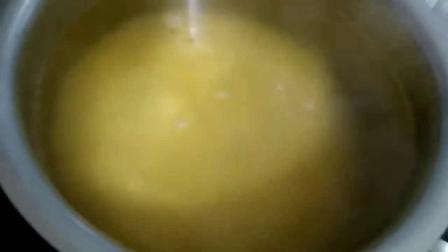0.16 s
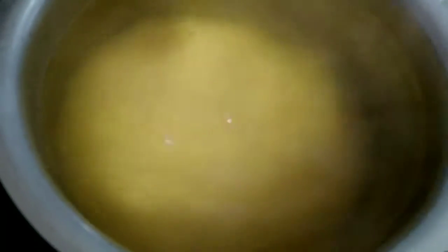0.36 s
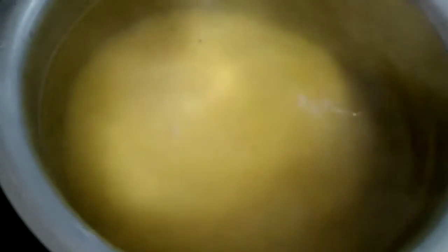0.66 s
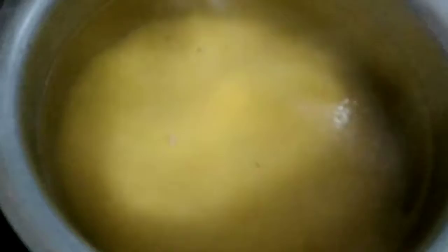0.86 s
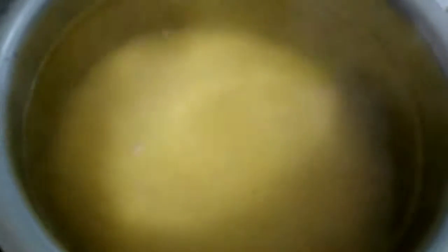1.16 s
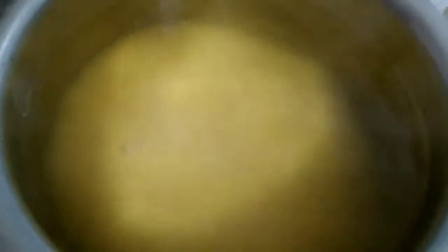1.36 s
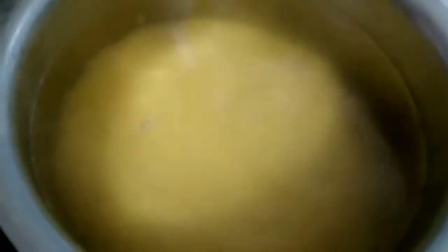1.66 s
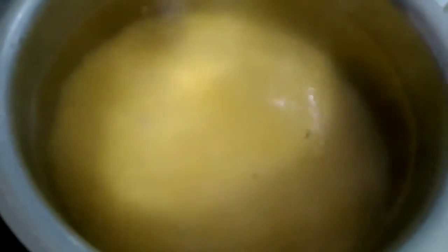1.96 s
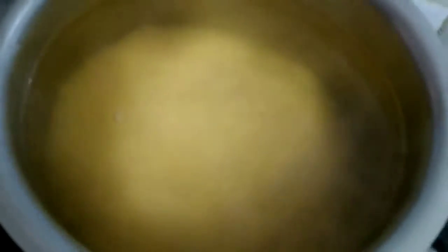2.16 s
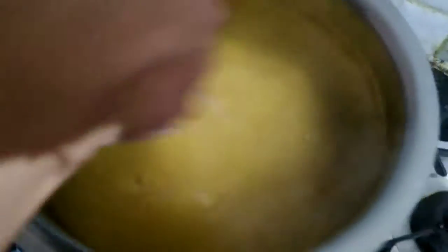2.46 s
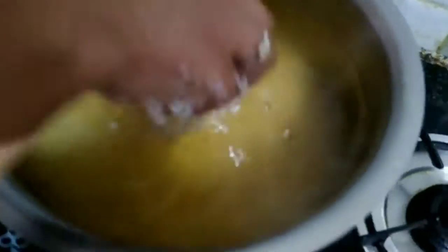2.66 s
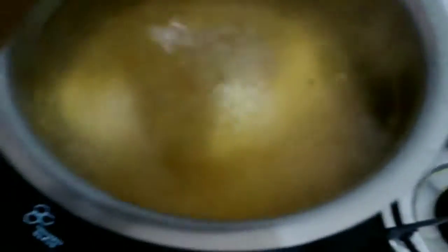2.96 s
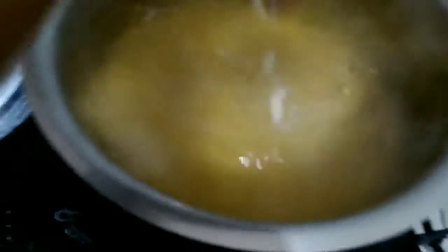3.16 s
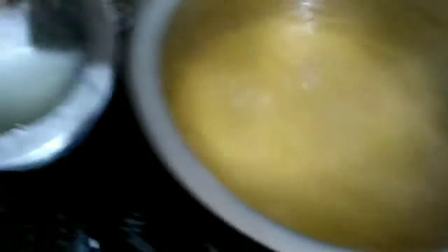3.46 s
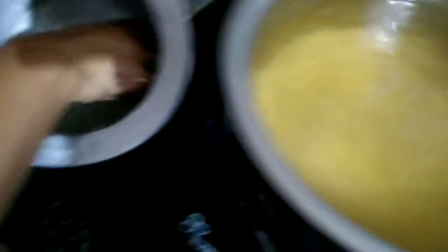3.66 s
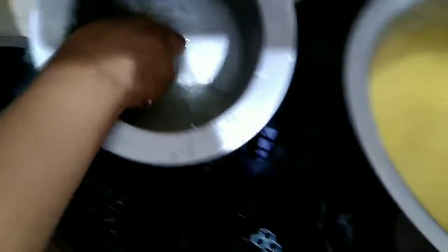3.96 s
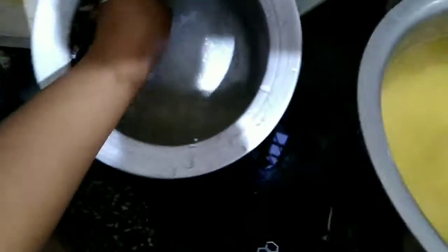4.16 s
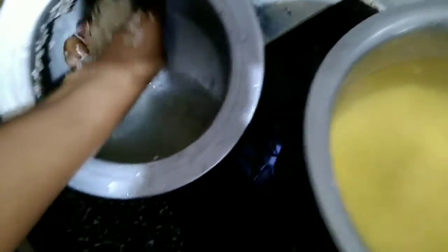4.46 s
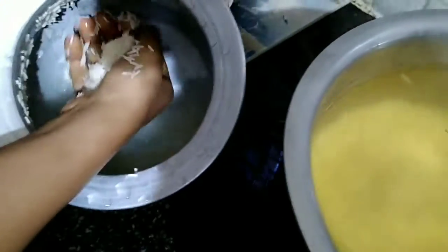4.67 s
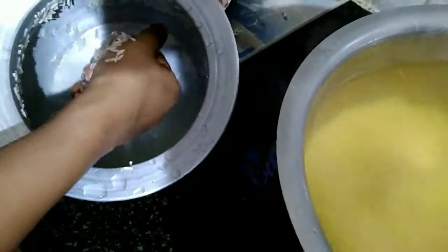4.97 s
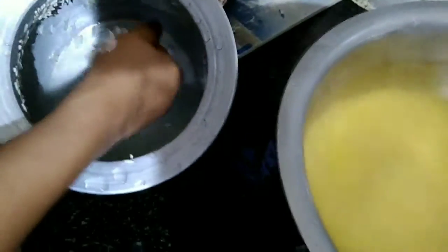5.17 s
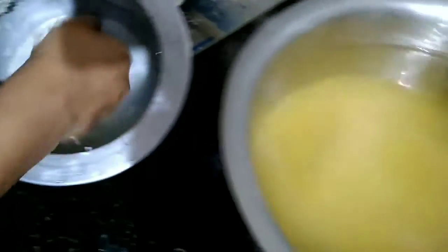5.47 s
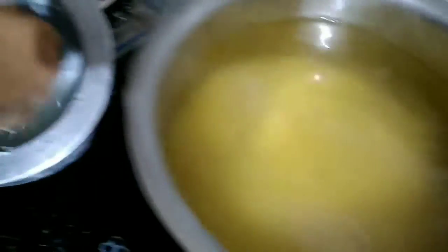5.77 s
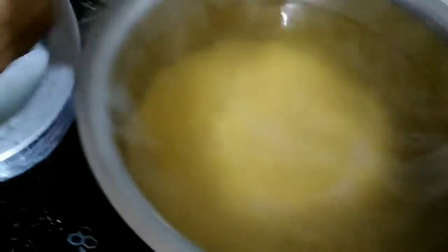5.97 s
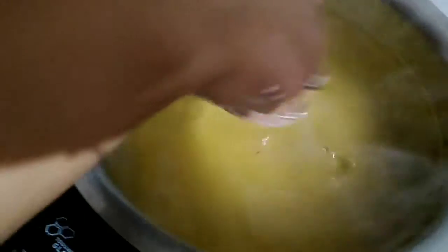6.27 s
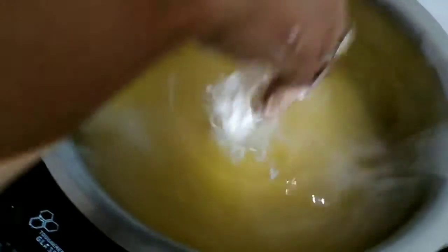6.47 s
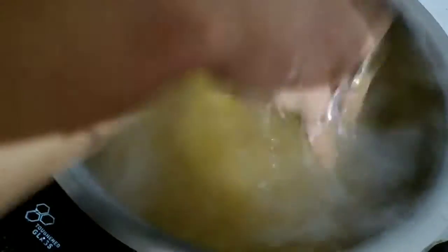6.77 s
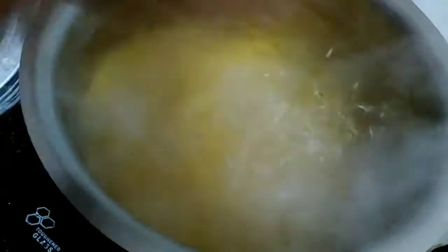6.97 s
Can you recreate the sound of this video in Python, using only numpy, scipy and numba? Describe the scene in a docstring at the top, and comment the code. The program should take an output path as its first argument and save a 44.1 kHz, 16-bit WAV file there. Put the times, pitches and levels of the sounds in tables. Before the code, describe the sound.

Close watery swishing and drips, a slap of soaked rice into hot water, gritty digging in a steel bowl, then a second splashy handful.

```python
"""A hand scoops soaked rice from a steel bowl of water into a simmering pot, in a small kitchen.
Throughout: stove rumble, microphone hiss, faint simmer. 0-1.3 s: swishing; bubbles ring, drops hit, air gulps.
2.7-3.3 s: rice slaps and patters (burst noise, pot modes). 3.7-5.6 s: digging; grit crunches, bubbles churn,
knocks ring the bowl's modes, rubbed steel sings. 5.9-7 s: a brush of the rim, then rice falls again
and the pot's air resonance glides, mostly up. Heard by a close, bright stereo microphone."""
import sys
import numpy as np
from scipy import signal
from scipy.fft import rfft, irfft
from scipy.io import wavfile
from scipy.ndimage import uniform_filter1d
from numba import njit

SR = 44100
rng = np.random.default_rng(int(sys.argv[2]) if len(sys.argv) > 2 else 0)


def bounce(signal):
    """Save signal as a 16-bit WAV file at the path given by the first command-line argument."""
    frames = np.transpose(np.atleast_2d(signal))
    limited = np.clip(frames, -1, 1)
    pcm = np.round(limited * 32767).astype(np.int16)
    wavfile.write(sys.argv[1], SR, pcm)


N = 314111
TIME = np.arange(N) / SR

# stove rumble, microphone hiss: [f/Hz, relative level/dB per Hz]
STOVE_SPECTRUM = [(20, -27.5), (40, -11), (65, -2), (100, 2.5), (150, -3), (230, -4.5), (330, -2.5),
                  (450, -49), (800, -31), (1300, -49), (3000, -55.5)]
HISS_SPECTRUM = [(1000, 15.5), (3000, -57), (5000, -10), (8000, -21), (12000, 10.5), (16000, 10)]
STOVE_DB, HISS_DB = -54.5, -76

# left-right balance of the microphone: [f/Hz, left-right/dB]
PORT_TILT = [(100, -0.5), (300, 1), (800, -0.5), (2500, 1), (5000, -1.5), (9000, 0.5), (13000, 2.5)]
CUTOFF_HZ = 15800

# hollow murmur of the air in the vessels: [t/s, level/dB]
HOLLOW_LEVEL = [(2.3, -84), (2.45, -62), (2.6, -54), (2.8, -73), (3.1, -56.5), (3.27, -73), (3.34, -59.5),
                (3.47, -57), (3.65, -82), (4.22, -55), (4.85, -55), (5.15, -67.5), (5.3, -56), (5.55, -65),
                (5.7, -54.5), (5.81, -66.5), (5.95, -53), (6.24, -62), (6.5, -50), (6.7, -56), (6.86, -64),
                (6.98, -46.5), (7.12, -63.5)]
# air resonances of the vessels: [f/Hz, width/Hz, level/dB]
CAVITY_MODES = [(582, 48, 1), (663, 48, 1), (752, 30.5, 8), (812, 42, 3.5), (844, 8.5, 10)]
CAVITY_TOP_HZ = 1050

# fingers and rice rub the steel: [t/s, level/dB, hold/s]
RUBS = [(5.22, -71, .02), (5.285, -52, 0.047), (5.38, -67, 0.0055)]
RUB_SWELL_S, RUB_FADE_S = .04, .065
# steel modes that rubbing brings out: [f/Hz, width/Hz, level/dB]
RUBBED_MODES = [(743, 62, 5.5), (1196, 18, 4), (1580, 53, -24), (1820, 30, -31), (2004, 27, -6.5),
                (2320, 33, -8), (2950, 30, -18), (3230, 90, -18), (3320, 110, -17)]
# brushes of the rim: [t/s, level/dB, swell/s, hold/s, fade/s]
BRUSHES = [(5.914, -58, .008, .02, .06)]
# modes of the bowl's rim: [f/Hz, width/Hz, level/dB]
RIM_MODES = [(1070, 24, -15), (1330, 29, -4), (1500, 39, -2), (1740, 60, 6), (2180, 35, -16),
             (2820, 22, -13.5), (3060, 52, -9), (3117, 28, 4), (3550, 28, -4)]

# light knocks and slaps on the steel: [t/s, level/dB]
KNOCKS = [(3.779, -49.5), (4.694, -44.5), (4.928, -41)]
# modes of the knocked steel: [f/Hz, level/dB, t60/s]
BOWL_MODES = [(380.5, 0, 0.34), (660, -8, 0.34), (806, 3, 0.26), (1082, -20, 0.13), (1310, -12, 0.18),
              (1880, -6, 0.11), (1965, 5, 0.07), (2170, -12, 0.046), (2304, 0, 0.19), (2430, -1, .09),
              (2783, -16, .16), (2940, -11, .16)]

# pot air resonance as the hand opens and lifts away: [t/s, f/Hz, level/dB]
OPENING = [(6.62, 810, -90), (6.66, 846, -56), (6.74, 910, -72), (6.8, 1100, -63.5), (6.85, 1180, -58),
           (6.89, 1214, -47.5), (6.92, 1130, -48.5), (6.97, 1147, -54), (7.12, 1160, -61.5)]
OPENING_WIDTH_HZ, OVERTONE_RATIO, OVERTONE_DB = 150, 1.97, -5
# modes of the half-full pot under falling rice: [f/Hz, width/Hz, level/dB]
POT_MODES = [(790, 70, -1), (1070, 15, 5.5), (1815, 70, -8.5), (2160, 26, 10), (2450, 200, 6),
             (2970, 68, 11), (3800, 44, 3), (3810, 49, 6), (4080, 41, 15)]
POT_RE_RICE_DB = -12.5

# tiny bubbles snapping close by: [t/s, relative level/dB, nominal f/Hz, left-right/dB]
POPS = [(0.989, -24, 7600, 13), (1.2772, -22, 13900, 8), (1.3432, -16, 13800, 12), (2.7202, -19, 15100, 14),
        (2.913, -17, 9600, 6), (2.9898, -14.5, 8800, 3), (3.127, -20.5, 10600, 1), (3.6613, -18, 12800, 4),
        (3.8225, -15, 11400, 4), (4.538, -17, 9400, -2), (4.609, -16, 13900, 21), (6.657, -11.5, 11700, 12),
        (6.895, -15, 12400, 15)]
# free bubbles: [t/s, f/Hz, relative level/dB]
BUBBLES = [(.012, 539, -39.5), (.074, 350, -44.5), (.06, 2360, -35), (.148, 2300, -38), (.163, 2110, -47),
           (.305, 1820, -42), (.456, 1940, -34), (.585, 2416, -32.5), (.676, 1550, -37), (.81, 1970, -42),
           (.508, 537, -36), (.535, 572, -38.5), (.572, 590, -33), (.615, 592, -34.5), (.645, 556, -44),
           (1.001, 444.4, -40.5), (1.003, 3000, -38), (1.008, 2454, -37.5), (1.066, 512, -37.5),
           (1.075, 2430, -26), (1.11, 462, -39.5), (1.127, 2160, -42), (1.158, 2080, -56),
           (1.228, 4120, -44), (1.322, 4340, -34.5), (1.346, 3600, -32), (1.372, 3080, -34),
           (1.376, 2830, -37), (1.41, 3280, -41), (1.39, 1403, -37.5), (1.464, 2720, -41.5),
           (1.466, 3640, -42), (1.485, 2560, -47), (1.499, 4260, -42), (1.529, 1920, -44),
           (1.535, 3700, -42), (1.601, 2940, -43.5), (1.621, 2220, -37), (1.745, 3580, -50.5),
           (1.94, 3020, -42.5), (2.04, 3720, -40.5), (2.045, 3000, -55), (2.234, 2830, -39.5),
           (2.262, 4570, -39), (2.264, 2660, -53), (3.004, 3830, -31), (3.085, 1038, -48.5),
           (3.183, 2710, -52.5), (4.478, 2410, -23.5), (4.497, 444.6, -32), (4.53, 739, -32),
           (4.255, 350, -43), (4.345, 1335, -42), (4.4, 955, -43), (4.46, 1737, -31.5), (5.208, 3180, -40),
           (5.213, 1800, -55), (5.497, 4480, -32), (6.097, 466, -39), (6.135, 444, -42), (6.185, 426, -45)]
# air gulping out from under hand or rice, quickly damped: [t/s, f/Hz, relative level/dB]
GULPS = [(.258, 2420, -13.5), (.347, 2800, -10.5), (.367, 718, -26.5), (.455, 2300, -22.5), (.63, 535, -21),
         (1.941, 3950, -24), (2.724, 2520, -29), (2.775, 1900, -31.5), (2.84, 2130, -37), (2.93, 2380, -35),
         (2.995, 1880, -36), (3.015, 2360, -33), (3.083, 860, -33.5), (3.11, 770, -33), (3.87, 510, -20.5),
         (4.18, 1970, -23), (4.498, 476, -16.5), (4.507, 470, -21), (4.536, 944, -24), (4.545, 646, -25.5),
         (4.695, 2950, -17), (4.929, 2310, -18), (5.498, 4410, -36), (6.585, 2320, -36), (6.605, 1980, -48),
         (6.622, 2550, -31), (6.658, 2390, -21.5), (6.676, 2020, -34), (6.894, 2180, -24),
         (6.943, 2020, -24)]
BUBBLE_CYCLES, GULP_CYCLES = 17.4, 3.26   # decay time in cycles

# wet rice slides into the water: [t/s, level/dB, swell/s, hold/s, body/dB]
RICE = [(2.715, -40, 0.0057, 0.046, 4.5), (2.834, -42, 0.0084, 0.13, 3.5), (3.014, -40, 0.0035, 0.0022, 6),
        (3.093, -80, 0.0083, 0.19, -24), (3.324, -50, 0.023, 0.0097, -7), (5.933, -93.5, 0.036, 0.066, -38),
        (6.365, -52.5, 0.019, 0.23, -24), (6.558, -45, 0.026, 0.058, 8.5), (6.797, -57.5, 0.062, 0.05, -6),
        (6.937, -39, 0.0064, 0.0027, 3)]
RICE_FADE_S = 0.031
# splashes of water: [t/s, level/dB, swell/s, body/dB]
SPLASHES = [(0.011, -40, 0.0023, 13), (0.34, -33, 0.0062, 7), (0.668, -38, 0.0015, -6),
            (.859, -38, 0.0033, -21), (0.999, -40, 0.0045, 10.5), (1.115, -41.5, 0.0086, 14),
            (1.368, -34, 0.0043, 9), (2.021, -32.5, 0.0078, -8), (2.238, -41, 0.012, -6.5),
            (2.829, -24.5, 0.0054, -2.5), (3.728, -26.5, 0.0045, -19), (3.775, -42.5, 0.0023, 24.5),
            (4.53, -32, 0.0045, 17.5), (5.678, -42.5, 0.01, -30), (6.642, -34, 0.0064, -4)]
FADE_PER_SWELL = 1.74
# single drops hit the water: [t/s, level/dB, body/dB]
DROPS = [(.019, -34, -15), (0.039, -33, -16), (.054, -53, -6), (.129, -53, -16), (.235, -39, -12),
         (0.258, -44, 17), (0.309, -28, 1), (.346, -30.5, -3), (.451, -35, 2), (0.48, -24.5, -17),
         (0.503, -30, -24), (.562, -30, -14), (0.58, -26.5, 0), (0.67, -29.5, 3), (0.676, -36, -5),
         (0.717, -32, -6), (0.779, -33, -16), (0.792, -37, -9), (.853, -32.5, -15), (0.88, -44, -18),
         (.918, -41, -26), (.959, -45, -20), (0.971, -42, -25), (0.989, -33.5, -12), (1.016, -33, -15),
         (1.02, -37, -4), (1.028, -46, -15), (1.118, -39, -12.5), (1.129, -32.5, -4), (1.184, -49, 8),
         (1.227, -50, 16), (1.304, -40.5, -6), (1.328, -39, -4), (1.339, -30, -1), (1.463, -39, 12),
         (1.498, -47.5, 12), (1.53, -39.5, 6), (1.6, -40, 7), (1.62, -38.5, 0), (1.867, -55, -21),
         (1.877, -45, -5), (1.892, -47, -12), (1.941, -37, -9.5), (2.1, -43, -26), (2.281, -47, -23),
         (2.622, -43.5, -10), (2.721, -20.5, -20), (2.87, -40, -11), (2.912, -24.5, 0), (2.934, -32, -9),
         (2.941, -28, -18), (2.946, -27, -1), (2.989, -20, -6), (3.029, -43, -2), (3.056, -29, -12),
         (3.126, -44, -13), (3.182, -51.5, 7.5), (3.197, -46, -30), (3.222, -44, -27), (3.228, -47, -20),
         (3.264, -46.5, -6), (3.409, -64, -16), (3.488, -52.5, -21), (3.661, -45.5, -17), (3.69, -33, -9.5),
         (3.737, -28, -26), (3.821, -32, -10), (3.892, -40, 21), (3.909, -42, -8), (4.034, -38, 20),
         (4.096, -31, -18), (4.4, -26, -10), (4.433, -27, -12), (4.539, -31, 1.5), (4.548, -45, 8),
         (4.609, -31, -20), (4.643, -28.5, -12), (4.696, -30, 13), (4.706, -33, -20), (4.928, -28, -17),
         (4.965, -39, -20), (5.246, -42, -30), (5.414, -43, -19), (5.497, -51, -10), (5.567, -73, -20),
         (5.652, -53, -17), (5.681, -35, -24), (5.739, -48, -25), (5.83, -56.5, -22), (5.918, -58, -5),
         (6.122, -52, -15), (6.132, -55, -30), (6.179, -58.5, -19), (6.268, -57, -17), (6.648, -25.5, 0),
         (6.653, -28, 5), (6.680, -25, 3), (6.856, -42, -7), (6.894, -28, 3), (6.942, -39, -3)]
DROP_SWELL_S, DROP_FADE_S = 0.00044, 0.0032
# stray drops flung by the hand; level is against the vigour curves
STRAYS_PER_S, STRAY_DB, STRAY_BODY_DB = 150, -3.5, 6
# slap colour, treble and body: [f/Hz, relative level/dB per Hz]
SLAP_TOP = [(2500, -41.5), (4000, -6.5), (6000, -1), (8000, -0.5), (11500, 6), (14000, 1.5), (16000, -5)]
SLAP_BODY = [(100, -24.5), (400, 4), (800, -7), (1350, -21.5), (2100, -1), (3500, 1.5), (5000, -11.5),
             (8000, -26)]
SLAP_WIDTH_DB = 1.5   # one-port impacts against those common to both
# where the slaps lie, leaning left, then nearly ahead: [t/s, left-right/dB]
BEARING = [(0, 7), (2.25, 5.5), (2.75, 0), (4.6, 3), (7, 0.5)]

# wet grains sliding over each other: [f/Hz, relative level/dB per Hz]
GRAIN_HISS = [(1000, -54), (1700, -54), (2600, -23), (3500, -14), (5890, -10), (12400, 3.5), (15500, 0)]
RICE_FINENESS_DB_PER_DB = 0.98   # hiss gained per dB of body lost
RICE_HISS_DB = -4.5
# falling rice, each against the level of the rice
RICE_PATTER_DB, RICE_SPRAY_DB, RICE_TINKLE_DB, RICE_GURGLE_DB = -5.5, -20, -24, -22

# vigour of the hand, swishing and digging: [t/s, level/dB]
SWISH = [(0, -44), (.2, -47), (.5, -43), (.65, -44), (.85, -51.5), (.95, -76), (1.14, -42.5), (1.26, -75),
         (1.32, -118)]
DIG = [(3.73, -42.5), (3.79, -39.5), (3.87, -40.5), (3.97, -43.5), (4.2, -33.5), (4.34, -38.5), (4.54, -37),
       (4.65, -43.5), (4.83, -43.5), (5.1, -68.5), (5.35, -57.5), (5.62, -100)]
USUAL_VIGOUR_DB = -44
# level at usual vigour/dB, gain per vigour (dB per dB)
SLOSH_DB, SLOSH_FOLLOWS = -47, 0.26
DIGGING_DB, DIGGING_FOLLOWS = -51.5, 1
SWISH_TINKLE_DB, SWISH_TINKLE_FOLLOWS = -47.5, 1.0
DIG_TINKLE_DB, DIG_TINKLE_FOLLOWS = -52, 1.17
PATTER_DB, PATTER_FOLLOWS = -45.5, 0.87
SPRAY_DB, SPRAY_FOLLOWS = -42, 0.61
GURGLE_DB = -56
# steady simmer: small bubbles; patter and spray
SIMMER_TINKLE_DB, SIMMER_DB = -80.5, -84

# grains crunching in the fist: [f/Hz, relative level/dB per Hz]
GRIT_SPECTRUM = [(400, -10), (1200, -1.5), (2300, -1), (5000, -5.5), (9000, -2), (15000, -4.5)]
GRIT_PER_S, GRIT_DB, GRIT_SURGE_DB = 600, -48.5, 3.5


def from_db(db):
    """Amplitude gain of a level in dB."""
    return 10 ** (np.asarray(db) / 20)


def rms_one(x):
    """Scale to rms 1."""
    return x / np.sqrt(np.mean(x ** 2) + 1e-20)


def level_curve(rows, column):
    """Gain along a dB column, -120 dB outside its span."""
    rows = np.array(rows)
    return from_db(np.interp(TIME, rows[:, 0], rows[:, column], left=-120, right=-120))


def panned(x, left_db):
    """Split the left-right level difference evenly over two channels."""
    return x * from_db(np.array([[.5], [-.5]]) * left_db)


def coloured(x, spectrum):
    """Causal minimum-phase filter, built by cepstrum from a (f/Hz, level/dB) table."""
    size = 4096
    hz, db = np.transpose(spectrum)
    bins_hz = np.arange(size // 2 + 1) * SR / size
    shape_db = np.interp(np.log(bins_hz + 1), np.log(hz), db)
    cepstrum = irfft(np.log(from_db(shape_db)))[:size // 2]
    cepstrum[1:] *= 2   # fold to the causal side
    response = irfft(np.exp(rfft(cepstrum, size)))
    return signal.oaconvolve(np.atleast_2d(x), response[None], axes=1)[:, :N]


def drift(knots_per_s):
    """Slow random curve: unit-normal knots joined by lines."""
    knots = rng.standard_normal(N // 20)
    return np.interp(TIME * knots_per_s, np.arange(len(knots)), knots)


def ring(clicks, hz, t60_s):
    """Two-pole resonator: a unit click starts a decaying sine of height about 1."""
    r = from_db(-60 / (t60_s * SR))
    w = 2 * np.pi * hz / SR
    return signal.lfilter([0, np.sin(w)], [1, -2 * r * np.cos(w), r * r], clicks + 1e-18)


def impacts(per_s, spread_db):
    """Random clicks, many small and a few large; mean power 1."""
    sizes = from_db(spread_db * np.minimum(rng.exponential(1, N), 4))
    signed = sizes * rng.choice([-1, 1], N)
    return rms_one(signed * (rng.random(N) < per_s / SR))


def burst(s, level_db, swell_s, hold_s, fade_s):
    """Gain that swells linearly, holds, then decays exponentially."""
    out = np.zeros(N)
    span = slice(int(s * SR), int(s * SR) + SR)
    t = TIME[span] - TIME[span][0]
    swell = np.minimum(t / swell_s, 1)
    fade = np.exp(-np.maximum(t - swell_s - hold_s, 0) / fade_s)
    out[span] = from_db(level_db) * swell * fade
    return out


@njit
def add(out, start, step, life, size, lag, glide):
    """Lay rising, dying sines into two channels, sized per channel, the right one lagged."""
    for k in range(len(start)):
        phase = 0.
        for i in range(min(int(5 * life[k]), out.shape[1] - start[k] - lag[k])):
            age = i / life[k]
            phase += step[k] * (1 + glide * age)
            wave = np.sin(phase) * np.exp(-age) * (1 - np.exp(-phase / 3))
            out[0, start[k] + i] += size[k, 0] * wave
            out[1, start[k] + i + lag[k]] += size[k, 1] * wave


def grains(low_hz, high_hz, per_s, cycles, spread_db, tilt_db, clump_db, scatter_db, patchy_db, glide=0.011):
    """Impacts trap bubbles, each with a pitch and place, in clumps of wandering favourite size; level evened near 1."""
    most_lag = 12   # samples
    count = int(per_s * N / SR)
    when, pitch, rank, place = rng.random((4, count))
    left_db = rng.standard_normal(count) * scatter_db
    start = (when * N).astype(int)
    octaves = pitch * np.log2(min(high_hz, CUTOFF_HZ) / low_hz)
    hz = low_hz * 2 ** octaves
    size_db = spread_db * np.minimum(-np.log(rank), 5) + tilt_db * octaves
    size_db += clump_db * drift(70)[start]
    size_db += patchy_db * np.cos(2 * np.pi * (octaves * 2 + drift(12)[start] / 2))
    sizes = panned(from_db(size_db), left_db).T.copy()
    x = np.zeros((2, N))
    add(x, start, 2 * np.pi * hz / SR, cycles * SR / hz, sizes, (place * most_lag).astype(int), glide)
    x = rms_one(x)
    local_power = uniform_filter1d(np.mean(x * x, axis=0), SR // 8)
    return x / np.sqrt(np.abs(local_power) + .02)


def mottled(x, echo_share, sway_s=.00035, sway_per_s=14):
    """Close echoes off the moving hand and water give a shifting, uneven colour."""
    out = x
    for delay_s in (.00045, .0008, .0014):
        read = TIME - delay_s - sway_s * np.tanh(drift(sway_per_s))
        out = out + echo_share * np.array([np.interp(read, TIME, channel) for channel in out])
    return out / (1 + echo_share ** 2) ** (3 / 2)


def kitchen(x, walls_db, room_db, walls_t60=0.049, room_t60=0.24):
    """Direct sound, quick flutter between steel walls, then the tiled room; low echoes are alike at both ports."""
    t = TIME[:SR // 2]
    response = np.zeros((2, len(t)))
    response[0, 0] = response[1, 5] = 1   # right port 5 samples late
    highpass = signal.butter(1, 750, "high", fs=SR, output="sos")
    for level_db, t60_s, first_s in ((walls_db, walls_t60, .0004), (room_db, room_t60, .005)):
        mid, side = rng.standard_normal(response.shape)
        side = signal.sosfilt(highpass, side)
        echoes = (mid + side * [[1], [-1]]) * from_db(-60 * t / t60_s) * (t > first_s)
        response += from_db(level_db) * rms_one(echoes) / np.sqrt(len(t))
    response /= np.sqrt(np.sum(response ** 2) / 2)
    return signal.oaconvolve(np.broadcast_to(x, (2, N)), response, axes=1)[:, :N]


def resonated(modes, waver_db=6.0):
    """Soft contacts excite a few resonances, each swelling and sinking on its own; rms 1."""
    contacts = impacts(per_s=1100, spread_db=6.0)
    x = np.zeros(N)
    for k, (hz, width_hz, db) in enumerate(modes):
        t60_s = np.log(1000) / np.pi / width_hz
        gain = (-1) ** k * from_db(db + waver_db * drift(12)) * width_hz
        x += gain * ring(contacts, hz, t60_s)
    return rms_one(kitchen(x, walls_db=16.5, room_db=15.0))


def gliding(hz, width_hz):
    """Soft contacts through one steep resonance that moves; rms 1."""
    turn = np.exp(2j * np.pi * np.cumsum(hz) / SR)
    r = np.exp(-np.pi * width_hz / SR)
    contacts = impacts(per_s=3900, spread_db=2.0)
    # shift down to 0 Hz, lowpass, shift back
    x = turn * signal.lfilter([1], [1, -2 * r, r * r], contacts / turn + 1e-18)
    return rms_one(kitchen(x.real, walls_db=-3, room_db=-4))


def vigour(curve):
    """How hard the hand moves the water; 1 is usual."""
    return level_curve(curve, 1) / from_db(USUAL_VIGOUR_DB)


def falling_rice():
    """Gain of the rice as it lands."""
    return sum(burst(s, db, swell, hold, RICE_FADE_S) for s, db, swell, hold, _ in RICE)


def background():
    """Filtered noise: stove rumble nearly alike at both ports, microphone hiss independent."""
    mid, side = rng.standard_normal((2, N))
    rumble = coloured(mid + from_db(-13) * side * [[1], [-1]], STOVE_SPECTRUM)
    hiss = coloured(rng.standard_normal((2, N)), HISS_SPECTRUM)
    return from_db(STOVE_DB) * rms_one(rumble) + from_db(HISS_DB) * rms_one(hiss)


def hollow():
    """Stirring and simmering excite the vessels' air modes; rubbing and brushing excite steel modes."""
    lowpass = signal.butter(4, CAVITY_TOP_HZ, fs=SR, output="sos")
    air = signal.sosfilt(lowpass, resonated(CAVITY_MODES, waver_db=4))
    rubbing = sum(burst(s, db, RUB_SWELL_S, hold, RUB_FADE_S) for s, db, hold in RUBS)
    brushing = sum(burst(*row) for row in BRUSHES)
    steel = rubbing * resonated(RUBBED_MODES, waver_db=1.5) + brushing * resonated(RIM_MODES, waver_db=7.5)
    return level_curve(HOLLOW_LEVEL, 1) * air + steel


def bowl(waver_db=3):
    """Each knock excites every steel mode at a random strength; the moving water makes the ring waver."""
    s, level_db = np.transpose(KNOCKS)
    out = np.zeros(N)
    for hz, mode_db, t60_s in BOWL_MODES:
        clicks = np.zeros(N)
        clicks[(s * SR).astype(int)] = from_db(level_db + mode_db + rng.normal(0, 2.5, len(s)))
        out += ring(clicks, hz, t60_s) * from_db(waver_db * drift(90))
    return kitchen(out, walls_db=-1.5, room_db=-6)


def pot():
    """Landing rice excites the pot's modes; its air resonance glides, mostly up, as the hand leaves."""
    s, hz, _ = np.transpose(OPENING)
    hz = np.interp(TIME, s, hz)
    overtone = gliding(OVERTONE_RATIO * hz, OPENING_WIDTH_HZ)
    air = gliding(hz, OPENING_WIDTH_HZ) + from_db(OVERTONE_DB) * overtone
    struck = falling_rice() * resonated(POT_MODES, waver_db=10.5)
    return level_curve(OPENING, 2) * air + from_db(POT_RE_RICE_DB) * struck


def pops(cycles=3.7, delay_s=0.00083):
    """A tiny bubble swells and snaps in about a millisecond: a dry ping, slightly rising."""
    out, t = np.zeros((2, N)), TIME[:SR // 100]
    for s, level_db, hz, left_db in POPS:
        age = t * hz / cycles
        at = int((s + delay_s) * SR)
        tone = np.sin(2 * np.pi * min(hz, 14500) * t * (.85 + .18 * np.tanh(age / 2)))
        snap = age * np.exp(1 - age) * tone
        out[:, at:at + len(t)] += panned(from_db(level_db - 3.0) * snap, left_db)
    return kitchen(out, walls_db=-5, room_db=-10, walls_t60=.012, room_t60=.3)


def bubbles(rows, cycles, room_db, rise=0.056, opening_cycles=2.4, wobble=0.024, tremble_db=3):
    """A bubble opens in a few cycles, wobbles, and rises in pitch nearing the surface; small ones die sooner."""
    out = np.zeros(N)
    shape = drift(220)
    strength = from_db(tremble_db * drift(260))
    for s, hz, level_db in rows:
        span = slice(int(s * SR), min(int(s * SR) + SR // 3, N))
        fade_s = cycles / hz
        t = TIME[span] - TIME[span][0]
        bend = rise * (np.tanh(t / fade_s / 2) - .5) + wobble * shape[span]
        phase = 2 * np.pi * np.cumsum(hz * (1 + bend)) / SR
        opening = 1 - np.exp(-(t * hz / opening_cycles) ** 2)
        out[span] += from_db(level_db) * strength[span] * np.sin(phase) * opening * np.exp(-t / fade_s)
    return from_db(3) * kitchen(out, walls_db=-5, room_db=room_db, room_t60=0.27)


def stray_drops(spread_db=4):
    """Envelope of drops flung at random by the hand, stronger as it works harder."""
    sizes = from_db(STRAY_DB + spread_db * np.clip(rng.standard_normal(N), -2, 2))
    hits = (rng.random(N) < STRAYS_PER_S / SR) * sizes
    hits = hits * (level_curve(SWISH, 1) + level_curve(DIG, 1))
    return signal.lfilter([1], [1, -np.exp(-1 / (DROP_FADE_S * SR))], hits + 1e-18)


def splats():
    """A slap of rice, water or a drop is a burst of tiny impacts; a heavier one has more body."""
    hits = [(s, db, swell, hold, RICE_FADE_S, body_db) for s, db, swell, hold, body_db in RICE]
    hits += [(s, db, swell, 0, FADE_PER_SWELL * swell, body_db) for s, db, swell, body_db in SPLASHES]
    hits += [(s, db, DROP_SWELL_S, 0, DROP_FADE_S, body_db) for s, db, body_db in DROPS]
    top = stray_drops()
    body = top * from_db(STRAY_BODY_DB)
    for *shape, body_db in hits:
        envelope = burst(*shape)
        top = top + envelope
        body = body + envelope * from_db(body_db)
    # shared, left only, right only
    paths = np.array([impacts(per_s=16000, spread_db=2.0) for _ in range(3)])
    crackle = rms_one(paths[0] + from_db(SLAP_WIDTH_DB) * paths[1:])
    crackle = panned(crackle, np.interp(TIME, *np.transpose(BEARING)))
    treble = from_db(3.0) * coloured(top * crackle, SLAP_TOP)
    thud = mottled(coloured(body * crackle, SLAP_BODY), echo_share=0.63)
    return kitchen(treble + thud, walls_db=1.0, room_db=-1.0, walls_t60=0.0032)


def sliding_rice():
    """Wet grains hiss as they slip from the fingers, more where they land with less body."""
    sliding = sum(burst(s, db - RICE_FINENESS_DB_PER_DB * body_db, swell, hold, RICE_FADE_S)
                  for s, db, swell, hold, body_db in RICE)
    hiss = coloured(impacts(per_s=6000, spread_db=1.5), GRAIN_HISS)
    hiss = rms_one(mottled(hiss, echo_share=0.71))
    hiss = panned(from_db(RICE_HISS_DB) * sliding * hiss, 0.97)
    return kitchen(hiss, walls_db=2.5, room_db=7.5, walls_t60=0.0045)


def gurgle_and_grit():
    """Mid-sized air pockets gurgle under swishing hand and landing rice; grains crunch in the closing fist."""
    pockets = grains(750, 2400, per_s=700, cycles=5, spread_db=2.5, tilt_db=1,
                     clump_db=3, scatter_db=4, patchy_db=2)
    gurgle = pockets * (from_db(GURGLE_DB) * vigour(SWISH) + from_db(RICE_GURGLE_DB) * falling_rice())
    contacts = np.array([impacts(per_s=GRIT_PER_S, spread_db=4.0) for _ in range(2)])
    surges = from_db(GRIT_DB + GRIT_SURGE_DB * drift(35))
    grit = rms_one(coloured(contacts, GRIT_SPECTRUM)) * surges * vigour(DIG)
    wet = kitchen(gurgle, walls_db=-1, room_db=3)
    return wet + kitchen(grit, walls_db=-3.5, room_db=-6.5, walls_t60=0.0035)


def running_water():
    """Bubble clouds by size: big cavities slosh, the hand digs, small ones tinkle, patter and fizz."""
    swish, dig = vigour(SWISH), vigour(DIG)
    hand = swish + dig
    rice = falling_rice()
    slosh = grains(310.6, 881, per_s=210, cycles=5.9, spread_db=2.0, tilt_db=-18.0,
                   clump_db=9.0, scatter_db=2.5, patchy_db=12.0)
    digging = grains(190, 1900, per_s=1800, cycles=2.8, spread_db=2, tilt_db=4.0,
                     clump_db=2, scatter_db=3, patchy_db=1.5)
    tinkle = grains(1200, 3900, per_s=230, cycles=11, spread_db=3.3, tilt_db=3, glide=.008,
                    clump_db=2, scatter_db=4, patchy_db=3)
    churn = grains(1400, 4000, per_s=550, cycles=9, spread_db=3, tilt_db=3, glide=.008,
                   clump_db=2, scatter_db=4, patchy_db=2)
    patter = grains(4000, 8800, per_s=1000, cycles=5, spread_db=3.5, tilt_db=5.5,
                    clump_db=2, scatter_db=6, patchy_db=2)
    spray = grains(9070, 13600, per_s=2600, cycles=1.13, spread_db=2.2, tilt_db=13.0,
                   clump_db=2, scatter_db=6, patchy_db=2)
    slosh = slosh * from_db(SLOSH_DB) * swish ** SLOSH_FOLLOWS
    digging = digging * from_db(DIGGING_DB) * dig ** DIGGING_FOLLOWS
    tinkle = tinkle * (from_db(SWISH_TINKLE_DB) * swish ** SWISH_TINKLE_FOLLOWS + from_db(SIMMER_TINKLE_DB))
    churn = churn * (from_db(DIG_TINKLE_DB) * dig ** DIG_TINKLE_FOLLOWS + from_db(RICE_TINKLE_DB) * rice)
    patter = patter * (from_db(PATTER_DB) * hand ** PATTER_FOLLOWS
                       + from_db(RICE_PATTER_DB) * rice + from_db(SIMMER_DB))
    spray = spray * (from_db(SPRAY_DB) * hand ** SPRAY_FOLLOWS
                     + from_db(RICE_SPRAY_DB) * rice + from_db(SIMMER_DB))
    # small bubbles radiate almost nothing below their own pitch
    highpass = signal.butter(2, 3800, "high", fs=SR, output="sos")
    fine = signal.sosfilt(highpass, patter + spray)
    small = panned(mottled(tinkle + churn, echo_share=0.16) + fine, 0.62)
    drops = kitchen(small, walls_db=-1.5, room_db=1.5)
    return drops + kitchen(slosh + digging, walls_db=-7.5, room_db=1.5)


def scene():
    """Sum of the steady kitchen, steel, rice and water."""
    vessels = background() + hollow() + bowl() + pot()
    air = bubbles(BUBBLES, BUBBLE_CYCLES, room_db=-0.5) + bubbles(GULPS, GULP_CYCLES, room_db=-1.0)
    rice = splats() + sliding_rice() + gurgle_and_grit()
    return vessels + pops() + air + rice + running_water()


def record(dry):
    """Stereo microphone: ports differ in colour, the left brighter at the very top; steep top cut."""
    ports = []
    for x, sign in zip(dry, (1, -1)):
        tilt = [(hz, sign * db / 2) for hz, db in PORT_TILT]
        ports.append(coloured(x, tilt))
    lowpass = signal.ellip(10, .2, 80, CUTOFF_HZ, fs=SR, output="sos")
    return signal.sosfilt(lowpass, np.vstack(ports))


dry = scene()
out = record(dry)
bounce(out)
```